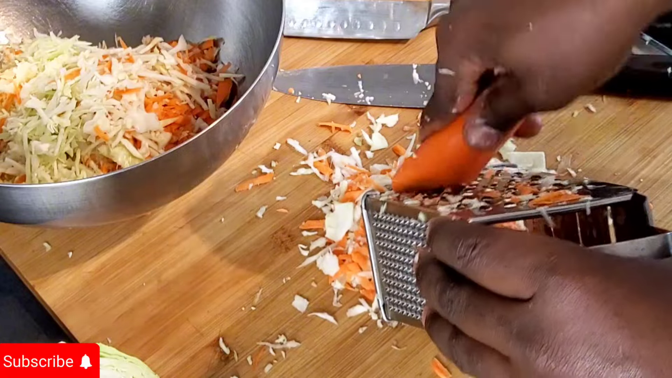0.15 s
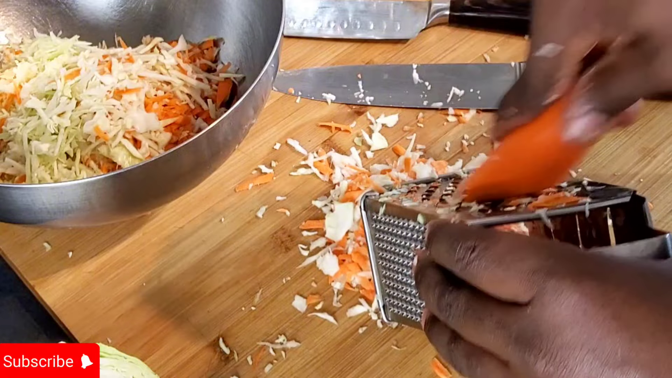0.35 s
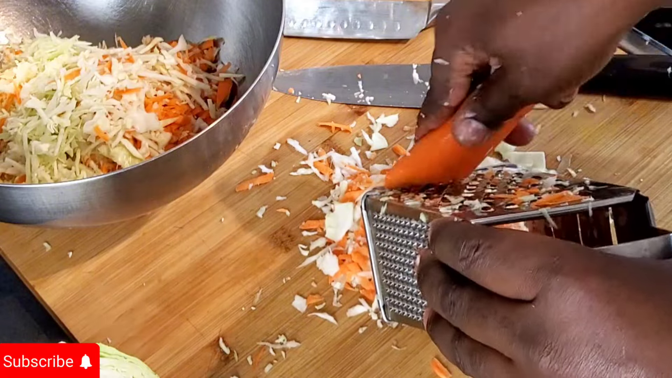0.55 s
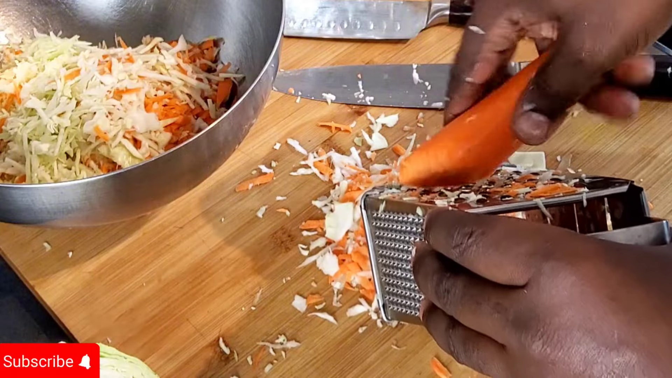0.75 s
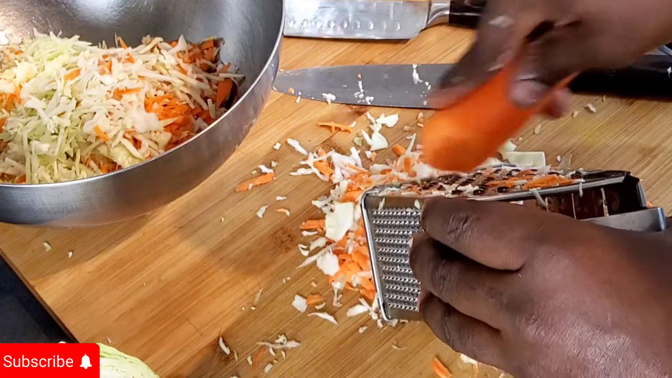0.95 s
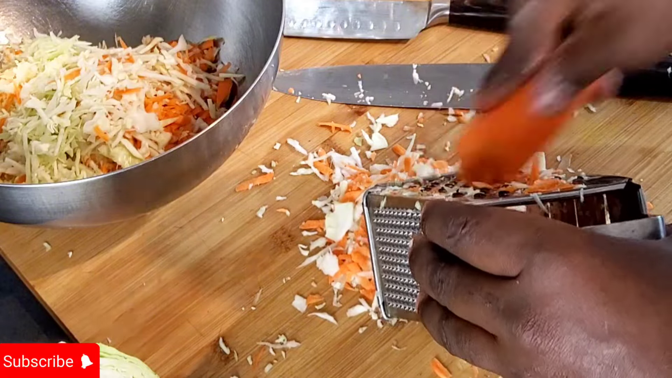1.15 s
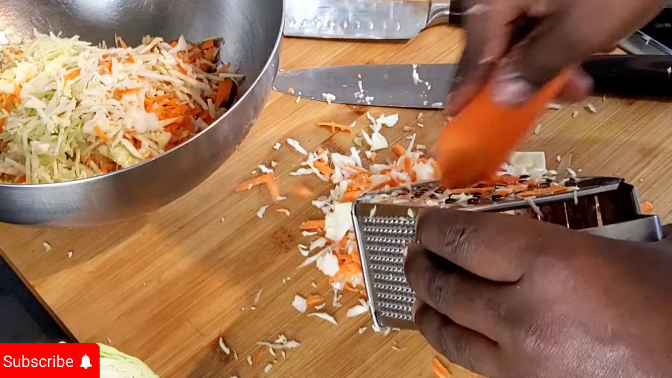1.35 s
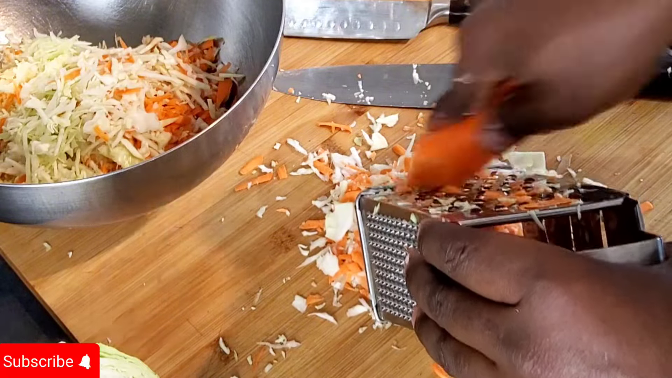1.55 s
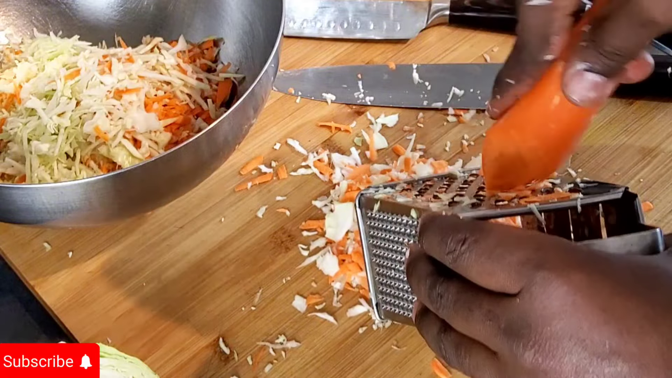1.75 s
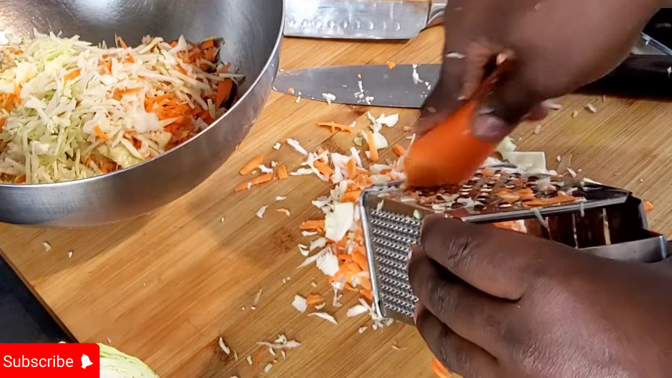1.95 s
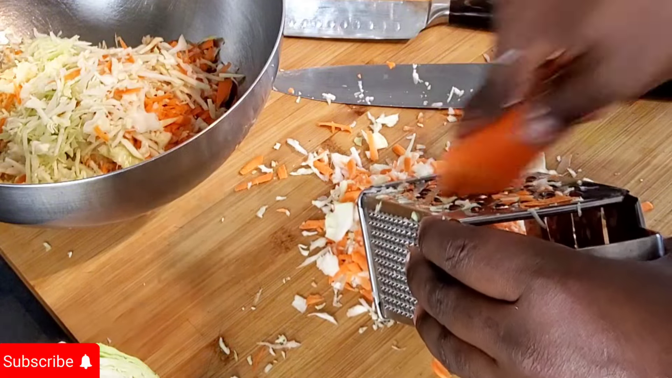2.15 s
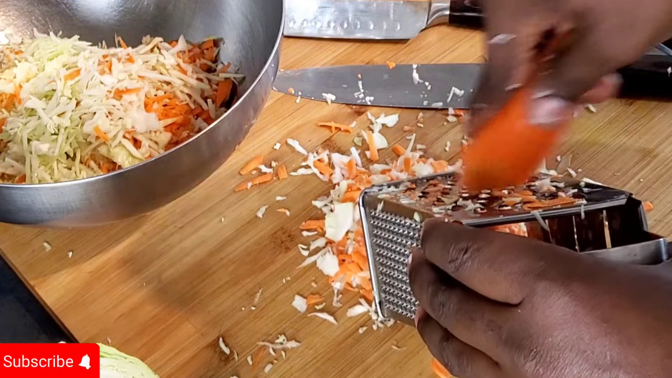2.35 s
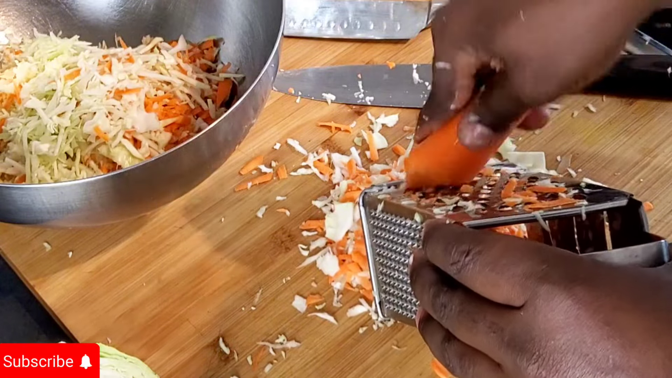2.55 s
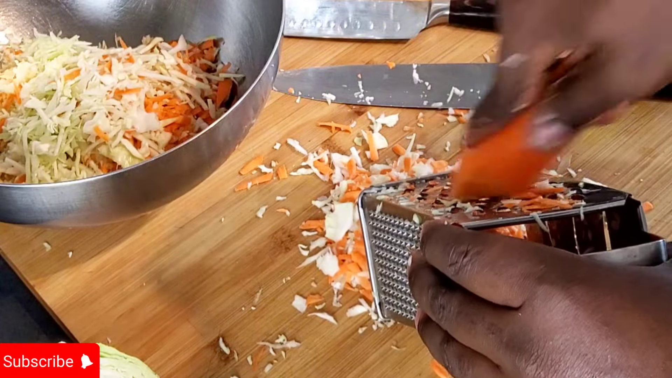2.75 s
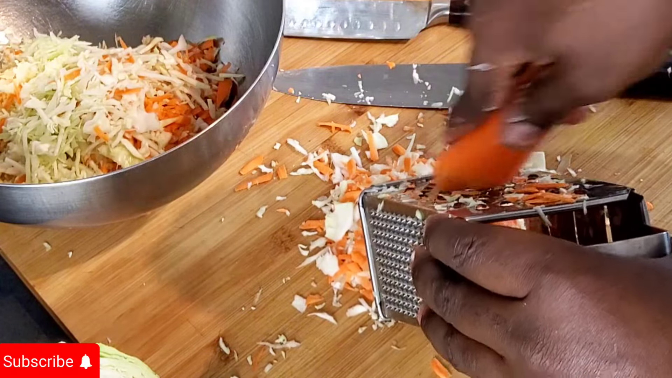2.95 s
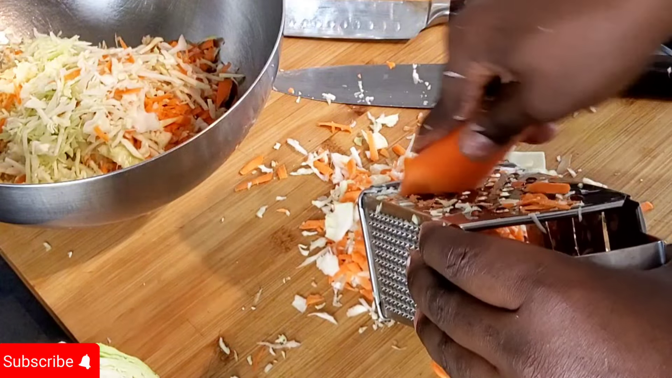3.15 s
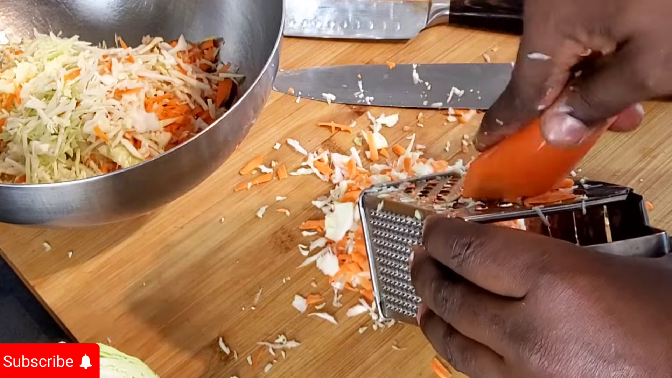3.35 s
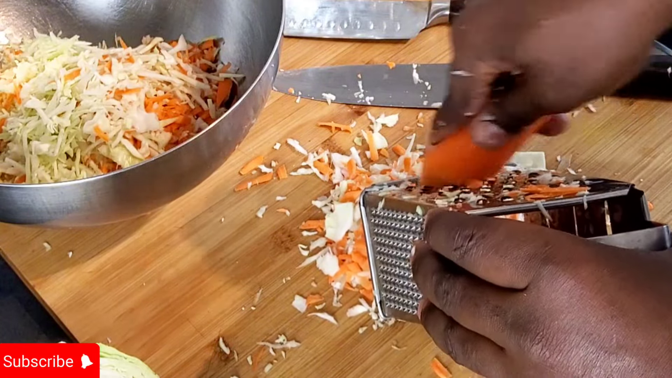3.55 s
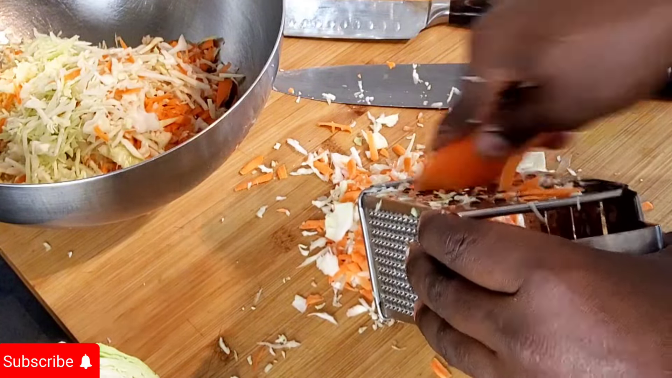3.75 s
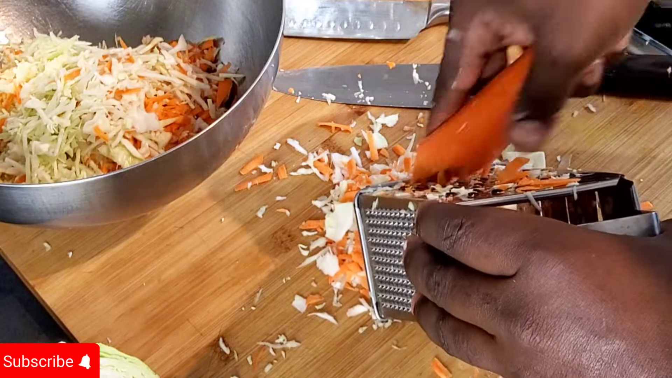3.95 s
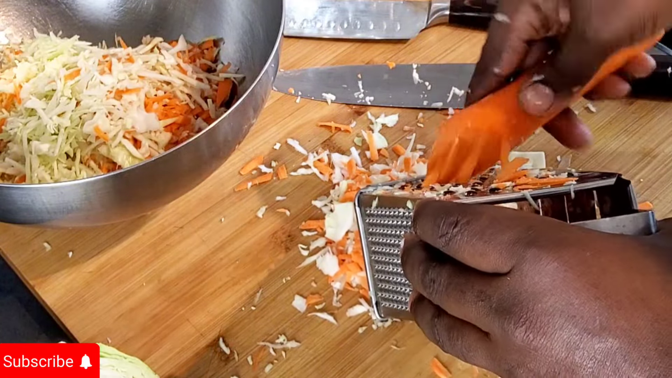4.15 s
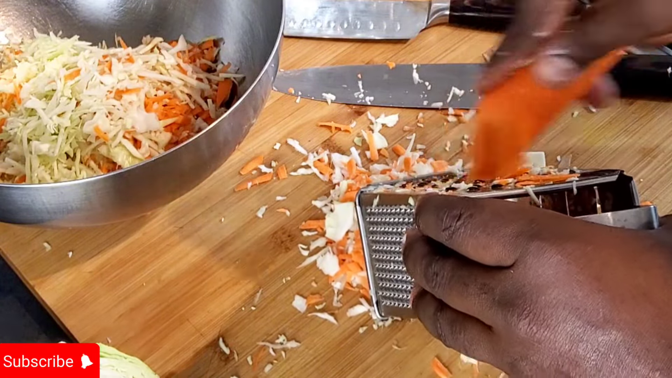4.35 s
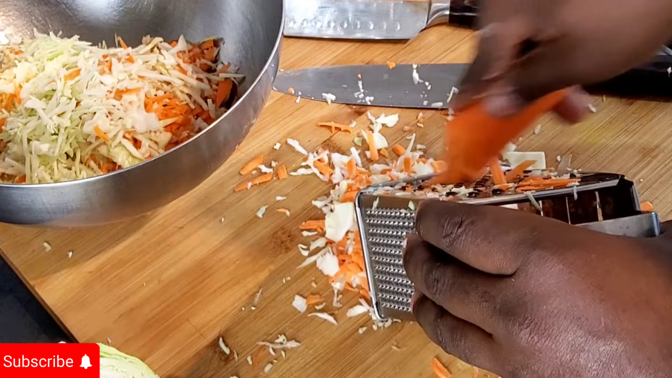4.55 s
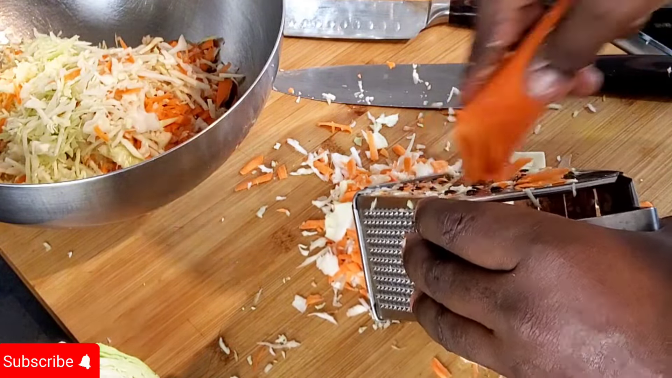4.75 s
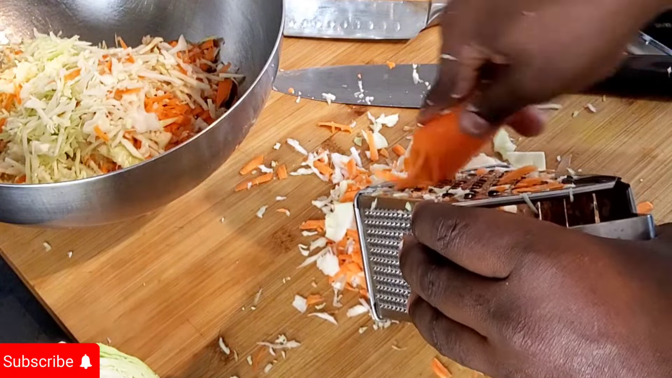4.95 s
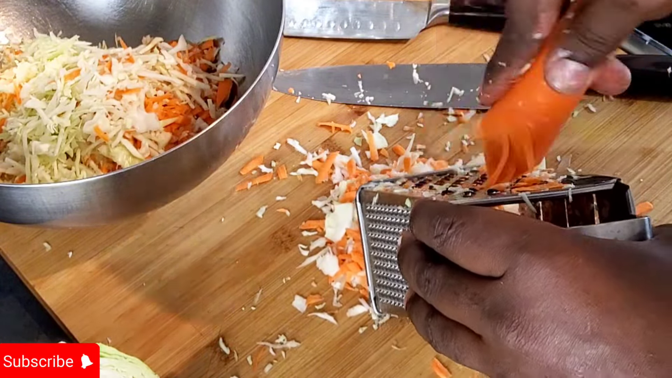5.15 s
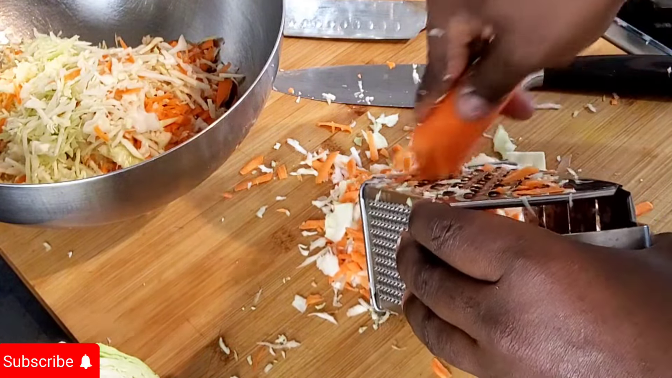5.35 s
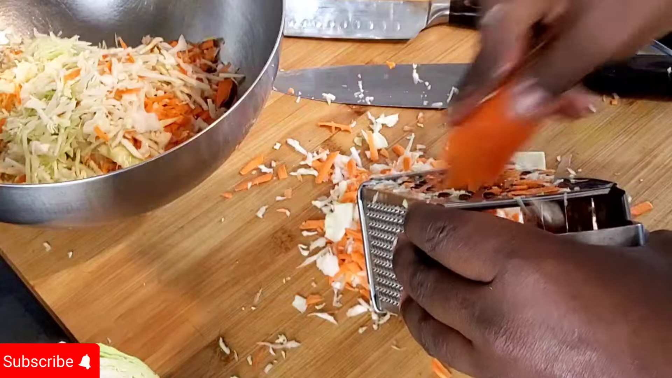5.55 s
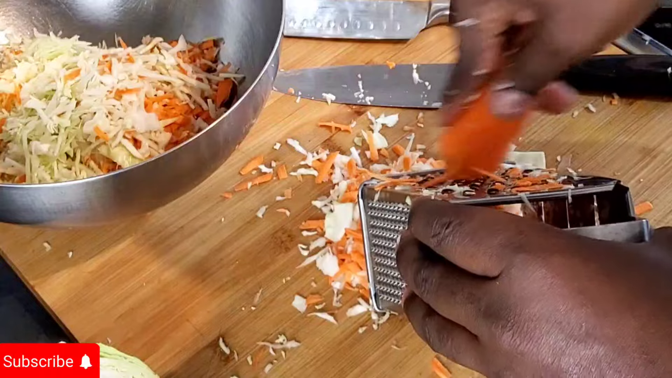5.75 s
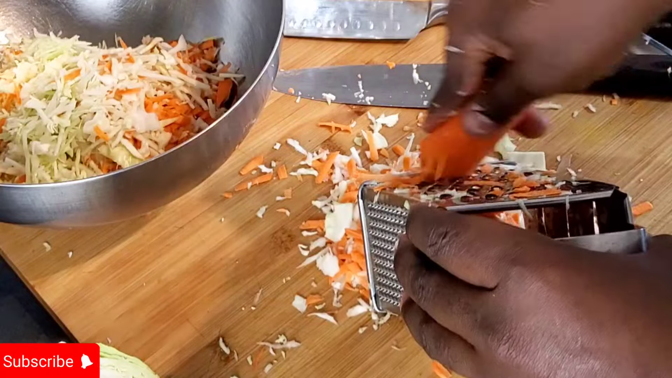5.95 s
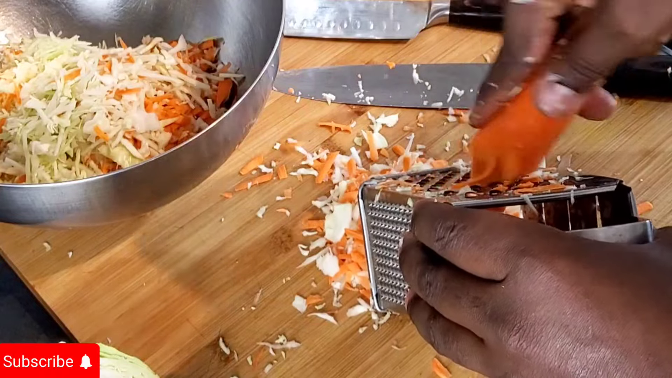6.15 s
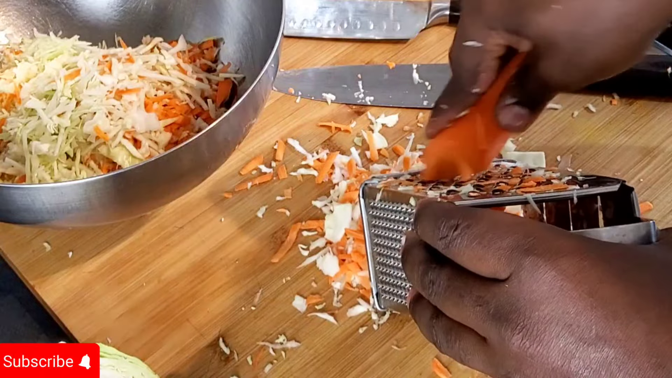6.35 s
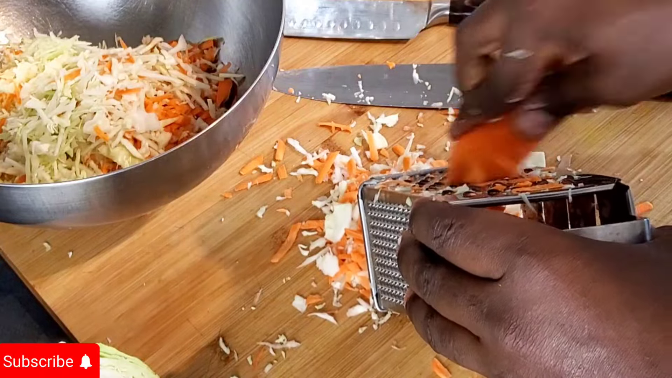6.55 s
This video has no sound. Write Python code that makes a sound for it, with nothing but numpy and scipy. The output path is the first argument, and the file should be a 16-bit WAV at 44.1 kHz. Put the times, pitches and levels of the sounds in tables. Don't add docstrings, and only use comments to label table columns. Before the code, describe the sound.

Heard from a hand's width by a small microphone, a firm carrot tears across grater teeth in short, hissy rasps. The thin metal box rings hollowly and its feet knock on a wooden board. Strokes come as a pair, then a long regular run, then a final run with heavy low bumps, separated by almost silent gaps. Small crisp fibre snaps punctuate the rasping.

```python
import sys
import numpy as np
from scipy import signal
from scipy.fft import rfft, irfft, next_fast_len
from scipy.io import wavfile
from scipy.ndimage import uniform_filter1d

SR = 44100
rng = np.random.default_rng(int(sys.argv[2]) if len(sys.argv) > 2 else 0)


def dump_mix(stems):
    frames = np.atleast_2d(stems).T
    limited = np.clip(frames, -1, 1)
    pcm = np.round(limited * 32767).astype(np.int16)
    wavfile.write(sys.argv[1], SR, pcm)


def invert_db(x):
    u = np.asarray(x, float) / 20
    return 10 ** u


N = 290619


def evened(x):
    return x / np.sqrt(np.mean(x ** 2) + 1e-20)


def steadied(x, span_s):
    power = uniform_filter1d(x ** 2, int(span_s * SR))
    return x / np.sqrt(power + 0.35 * np.mean(x ** 2))


def at_samples(t, *controls):
    return [np.interp(np.arange(N) / SR, t, control) for control in controls]


def add(mix, start_s, sound):
    part = mix[round(start_s * SR):][:len(sound)]
    part += sound[:len(part)]


def colour(x, points):
    hz, db = np.transpose(points)
    size = next_fast_len(len(x))
    bin_hz = np.fft.rfftfreq(size, 1 / SR)
    gain = invert_db(np.interp(np.log(bin_hz + 1), np.log(hz), db))
    return irfft(rfft(x, size) * gain, size)[:len(x)]


def ring(x, modes):
    out = 0
    for k, (hz, width_hz, db) in enumerate(modes):
        b, a = signal.iirpeak(hz, hz / width_hz, SR)
        out = out + (-1) ** k * invert_db(db) * signal.lfilter(b, a, x)
    return out


def flutter(span_s, depth_db):
    size = max(int(span_s * SR), 2)
    smooth = uniform_filter1d(uniform_filter1d(rng.standard_normal(N), size), size)
    return invert_db(depth_db * evened(smooth))


def summed(*levels_db):
    return 10 * np.log10(sum((invert_db(level) ** 2).sum(0) for level in levels_db))


def after(u, ease_s):
    return ease_s * np.logaddexp(0, u / ease_s)


ROCK_RISE_DB, ROCK_FALL_DB = 28.5, 14.5


def hump(u):
    slope_db = np.where(u < 0, ROCK_RISE_DB, ROCK_FALL_DB)
    return -slope_db * (np.sqrt(1 + u ** 2) - 1)


# t/s, level/dB, low f/Hz, high f/Hz
SIDE_BURSTS = [
    (.094, -22.5, 9060, 10950),
    (3.487, -22.5, 9050, 12000),
]


def side_bursts():
    out = np.zeros(N)
    noises = rng.standard_normal((len(SIDE_BURSTS), 2048))
    for (s, db, low_hz, high_hz), noise in zip(SIDE_BURSTS, noises):
        band_pass = signal.butter(8, [low_hz, high_hz], "band", fs=SR, output="sos")
        band = signal.sosfiltfilt(band_pass, noise)
        add(out, s, invert_db(db) * evened(band) * np.hanning(2048))
    return np.outer([1, -1], out)


# t/s, peak level/dB, f/Hz
COUNTER_BUMPS = [(0.35, -24.5, 150), (0.584, -30, 129), (0.623, -29, 93), (0.717, -37, 92.3),
                 (1.259, -26, 207), (5.678, -10.5, 87), (5.709, -4.5, 197), (5.747, 1.5, 143),
                 (5.776, -3, 236), (5.844, -11, 79), (5.876, -7, 103), (5.933, -15, 180), (6.081, -24, 155),
                 (6.148, -14, 111)]


def bumps():
    out, t = np.zeros(N), np.arange(4000) / SR
    for s, db, hz in COUNTER_BUMPS:
        u = t * hz
        cycles = u + 0.48 * (1 - np.exp(-u / 1.2))
        swing = np.sin(2 * np.pi * cycles) * u * np.exp(-u / 0.41)
        add(out, s, invert_db(db - 4.5) * swing / abs(swing).max())
    return out


# t/s, width/s, board hum level/dB, counter rumble level/dB, knock of the feet level/dB
PRESSES = [(0.161, 0.034, -33, -45, -37), (0.49, 0.029, -31, -41, -44), (1.263, 0.049, -30, -40, -35),
           (1.61, 0.055, -39.5, -50, -37.6), (1.921, 0.045, -41.5, -52, -35.5),
           (2.221, 0.017, -33.7, -44, -36), (2.265, 0.023, -36.5, -43, -39),
           (2.554, 0.031, -41.5, -47.5, -43.5), (2.874, 0.028, -41.6, -50, -46),
           (3.17, 0.037, -35.7, -41, -40), (3.499, 0.039, -39.5, -44, -39),
           (3.812, 0.03, -29.7, -39.5, -45.5), (4.63, 0.036, -26.5, -37, -33),
           (4.983, 0.045, -30.4, -37, -36), (5.329, 0.045, -30.5, -37, -35),
           (5.667, 0.041, -30, -39, -36.5), (6.314, 0.059, -51.5, -59, -48.5)]
# (t/s, width/s, three levels/dB)
TURNS = [(0.007, 0.034, -31, -40, -35.5), (1.108, 0.018, -38.5, -56, -43),
         (1.415, 0.024, -30.5, -60, -52.7), (1.435, 0.044, -36, -60, -40.5),
         (1.759, 0.039, -26.5, -45.1, -31.5), (2.102, 0.029, -28, -37.5, -30.5),
         (2.436, 0.033, -30, -42, -33.5), (2.716, 0.058, -65.4, -76, -59), (3.035, 0.033, -69, -76, -54.5),
         (3.346, 0.029, -59, -73, -52), (3.633, 0.18, -71.5, -72, -63), (4.224, 0.031, -80.5, -87, -90.5),
         (4.715, 0.083, -42.5, -47, -45.5), (4.822, 0.036, -42.5, -61, -40),
         (5.128, 0.038, -37.5, -46.5, -40.8), (5.475, 0.063, -33.5, -39.5, -35)]
# (t/s, width/s, three levels/dB)
JOLTS = [(0.368, 0.043, -41, -35.5, -49), (0.589, 0.025, -42, -28.5, -65),
         (0.638, 0.016, -45.5, -22.5, -58), (0.73, 0.029, -60.5, -30.5, -65.9),
         (0.827, 0.065, -81.5, -47, -72.5), (0.913, 0.096, -82, -79, -88.8), (5.679, 0.019, -26, -15, -27),
         (5.738, 0.036, -17.5, -21, -23.5), (5.796, 0.012, -45.4, -13.5, -49.6),
         (5.858, 0.051, -27, -19, -32.1), (5.94, 0.017, -29.5, -21, -52), (5.984, 0.023, -29, -19, -44),
         (6.091, 0.017, -25.5, -29, -45), (6.147, 0.077, -42.5, -24.5, -51.5),
         (6.437, 0.016, -92.5, -44, -82), (6.493, 0.033, -66, -51.5, -56.5)]
STILL_DB = -102.0


def rocking():
    t = np.arange(0, N / SR + .002, .001)
    s, width, *levels_db = np.vstack([PRESSES, TURNS, JOLTS]).T[:, :, None]
    shape_db = hump((t - s) / width)
    still_db = np.full((1, len(t)), STILL_DB)
    return at_samples(t, *[summed(db + shape_db, still_db) for db in levels_db])


HUM_HZ = 193.8
# f/Hz, level/dB per Hz
THUD_SPECTRUM = [(100, -30.5), (140, 6), (250, -2), (330, -52)]
# f/Hz, level/dB per Hz
RUMBLE_SPECTRUM = [(25, -30.5), (50, 5.5), (70, 6.5), (110, 10.5), (140, -8), (200, -54.5)]
# f/Hz, width/Hz, level/dB
KNOCK_MODES = [(277, 30, 5.5), (376, 78, -0.5), (473, 40, 6), (617, 110, -1)]


def board():
    hum_db, rumble_db, knock_db = rocking()
    thud_noise, rumble_noise, feet_noise = rng.standard_normal((3, N))
    tonal = 1 / (1 + np.exp((rumble_db - hum_db + 9.5) / 1.9))
    phase = 2 * np.pi * np.cumsum(HUM_HZ * flutter(.02, .3)) / SR
    tone = np.sqrt(2) * np.sin(phase) * flutter(.012, 1.5)
    thud = steadied(colour(thud_noise, THUD_SPECTRUM), 0.032)
    hum = np.sqrt(tonal) * tone + np.sqrt(1 - tonal) * thud
    rumble = steadied(colour(rumble_noise, RUMBLE_SPECTRUM), 0.32)
    chatter = feet_noise * flutter(0.012, 1.0)
    knock = ring(ring(chatter * invert_db(knock_db), KNOCK_MODES), [(390, 190, 0)])
    knock = knock / np.std(ring(chatter, KNOCK_MODES))
    return invert_db(hum_db + 3.0) * hum + invert_db(rumble_db - 3.0) * rumble + invert_db(1.5) * knock


# t/s, f/Hz, level/dB
SKIN_SQUEAK = [
    (.97, 15300, -78),
    (1.03, 14950, -67),
    (1.07, 14850, -68),
    (1.13, 14800, -87),
]


def squeak():
    points = [(0, 15000, -140), (.96, 15000, -140)] + SKIN_SQUEAK + [(1.14, 15000, -140)]
    s, *columns = np.transpose(points)
    hz, db = at_samples(s, *columns)
    return invert_db(db) * np.sin(2 * np.pi * np.cumsum(hz) / SR) * flutter(.004, 2.5)


# t/s, peak level/dB, f/Hz, t60/s
FIBRE_SNAPS = [(0.9624, -59, 7000, 0.016), (1.0266, -61, 8140, 0.01), (2.3457, -12.5, 8550, 0.06),
               (2.3794, -16, 13400, 0.032), (2.395, -17, 11600, 0.022), (2.417, -34, 9000, 0.015),
               (2.437, -36, 11000, 0.019), (3.0662, -39, 12300, 0.014), (4.3666, -60.5, 12900, 0.045),
               (4.4374, -51.5, 13700, 0.011), (4.4902, -59, 7010, 0.022), (4.5093, -57, 7020, 0.016),
               (5.1575, -30, 9700, 0.023), (5.482, -27, 13500, 0.02), (5.7744, -33, 12500, 0.02)]


def snaps():
    out, t = np.zeros(N), np.arange(1500) / SR
    noises = rng.standard_normal((len(FIBRE_SNAPS), 1500))
    for (s, db, hz, t60), noise in zip(FIBRE_SNAPS, noises):
        decay = invert_db(-60 * t / max(t60, .004))
        burst = noise * decay * np.minimum(t / 0.0015, 1)
        burst = ring(burst, [(hz, 0.44 * hz, 0)]) + 0.16 * burst
        add(out, s, invert_db(db - 2.5) * burst / abs(burst).max())
    return out


# t/s, length/s, level/dB, f/Hz
PANEL_RINGS = [(0.25, 0.11, -53.5, 2930), (1.082, 0.093, -64, 967), (1.084, 0.065, -62.5, 1412),
               (1.07, 0.056, -70.5, 5600), (1.222, .07, -28.5, 1713), (1.243, 0.095, -37, 1003),
               (1.561, 0.057, -29, 1690), (2.25, 0.089, -33.5, 469), (2.338, .022, -35.5, 2700),
               (2.342, 0.029, -39, 3344), (2.409, 0.03, -42, 1950), (2.511, 0.057, -25.5, 1750),
               (3.614, 0.077, -50, 1770), (3.641, 0.067, -50, 2240), (3.624, 0.07, -53, 3390),
               (3.638, 0.066, -55, 4550), (5.965, 0.055, -28, 900), (6.281, 0.1, -40, 516.7),
               (6.566, 0.045, -51, 4790)]


def panel_rings():
    out = np.zeros(N)
    noises = rng.standard_normal((len(PANEL_RINGS), 8000))
    for (s, length_s, db, hz), noise in zip(PANEL_RINGS, noises):
        size = int(length_s * SR)
        mode = [(hz, 0.012 * hz, 0)]
        tone = ring(ring(noise, mode), mode)[-size:]
        add(out, s, invert_db(db) * evened(tone) * np.hanning(size))
    return out


def tearing(per_s=6000, spread_db=0.0):
    sizes = invert_db(spread_db * np.minimum(rng.exponential(1, N), 4))
    cracks = sizes * (rng.random(N) < per_s / SR) * rng.choice([-1, 1], N)
    slide = 0.37 * rng.standard_normal(N)
    return (evened(cracks) + slide) * flutter(.0012, 1.0) * flutter(.006, .7)


def patched(x, bins, frames, patchy_db):
    z = signal.stft(x, nperseg=512, noverlap=384)[2]
    field = rng.standard_normal(z.shape)
    for _ in range(2):
        field = uniform_filter1d(field, max(int(bins), 1), 0)
        field = uniform_filter1d(field, max(int(frames), 1), 1)
    depth_db = np.pad(patchy_db, (0, 1024), "edge")[::128][:z.shape[1]]
    gain = invert_db(depth_db * evened(field))
    gain /= np.sqrt(np.mean(gain ** 2, axis=0))
    return evened(signal.istft(z * gain, nperseg=512, noverlap=384)[1][:N])


# bite t/s, rasp level/dB, hold/s, fade/(dB per s), box ring level relative to rasp/dB
STROKES = [(0.083, -10.5, 0.06, 257.5, -7), (0.427, -10, 0.065, 277.5, -8),
           (1.197, -20, 0.058, 230.5, -0.7), (1.544, -17.5, 0.064, 245, -0.5),
           (1.863, -14, 0.072, 240.5, -3.5), (2.186, -13, 0.066, 265.5, -6.5),
           (2.495, -11.5, 0.063, 265.5, -7), (2.812, -13.5, 0.064, 310.5, -8.5),
           (3.13, -14.5, 0.081, 369.5, -8.7), (3.45, -13.5, 0.064, 304, -5.5),
           (3.763, -13.5, 0.061, 331, -8), (4.568, -17.5, 0.049, 185, -2.5),
           (4.93, -15, 0.044, 213.5, -2.5), (5.251, -17.0, 0.088, 242.0, -2.5),
           (5.589, -14, 0.077, 277, -5), (5.934, -13.5, 0.062, 292.5, -5), (6.254, -18.0, 0.088, 360, -8.5),
           (6.596, -6.5, 0.08, 250.0, -6.5)]
BITE_DB_PER_S, SWELL_DB, SWELL_S, LIFT_S = 1400, 14.5, 0.019, 0.0068
BOX_LAG_DB, BOX_LAG_S = 7.0, 0.023
# turn t/s, length/s, rasp level/dB, box ring level relative to rasp/dB
RETURNS = [(0.009, 0.068, -40, 7), (0.379, 0.171, -47, 0.5), (1.448, 0.067, -57.5, 14.5),
           (1.807, 0.11, -48.2, 8), (2.129, 0.06, -43, 6), (2.449, 0.064, -39.5, 1.5),
           (2.738, 0.032, -54.5, 2.5), (3.113, 0.11, -61, 3.5), (3.374, 0.016, -52, 0.5),
           (3.686, 0.043, -46.0, -0.2), (4.854, 0.063, -67.5, 19), (5.183, 0.076, -47.5, 8),
           (5.588, 0.12, -45.5, 3.5), (5.852, 0.06, -42, -1), (6.2, 0.11, -51, -0.5),
           (6.512, 0.012, -57.5, 2.5)]
SAG_DB_PER_S, LAND_DB_PER_S, TURN_DB_PER_S, EASE_S = 145.5, 280.5, 279.5, .008
AIRBORNE_S = 0.3
# t/s, width/s, rasp level/dB, box ring level relative to rasp/dB
BRUSHES = [(.74, .06, -78.5, 5.5), (.89, 0.04, -68, -8), (1.01, 0.031, -77, -26.5), (1.11, 0.034, -65, -1),
           (1.166, 0.018, -54, -20), (4.0, .04, -71.5, -7), (4.212, 0.012, -72.5, -10),
           (4.436, .018, -75, -22.5), (4.516, 0.0089, -83, -25)]
REST_DB, REST_BOX_DB = -84.5, -99.0


def contact():
    t = np.arange(0, N / SR + .002, .001)
    s, db, hold, fade, box_db = np.transpose(STROKES)[:, :, None]
    since = np.maximum(t - s, 0)
    push = db - SWELL_DB * np.exp(-since / SWELL_S)
    push = push + BITE_DB_PER_S * np.minimum(t - s, 0) - fade * after(t - s - hold, LIFT_S)
    push_box = push + box_db - BOX_LAG_DB * np.exp(-since / BOX_LAG_S)

    s, length, db, drag_box_db = np.transpose(RETURNS)[:, :, None]
    drag = db - SAG_DB_PER_S * (t - s + length / 2)
    drag = drag - TURN_DB_PER_S * after(t - s, EASE_S)
    drag = drag - LAND_DB_PER_S * after(s - length - t, EASE_S)
    drag = drag - BITE_DB_PER_S * after(s - length - AIRBORNE_S - t, EASE_S)

    s, width, db, brush_box_db = np.transpose(BRUSHES)[:, :, None]
    brush = db + hump((t - s) / width)
    rest = np.ones((1, len(t)))
    rasp_db = summed(push, drag, brush, REST_DB * rest)
    box_ring_db = summed(push_box, drag + drag_box_db, brush + brush_box_db, REST_BOX_DB * rest)
    return at_samples(t, rasp_db, box_ring_db - rasp_db)


# f/Hz, level/dB per Hz
RASP_SPECTRUM = [(1500, -44.5), (3000, -21), (5600, -19.5), (9000, -10.5), (11500, -6.5), (13500, -2.5),
                 (15000, -6.5), (16000, -25)]
# f/Hz, level/dB per Hz
SCRAPE_SPECTRUM = [(300, -35.5), (550, 1.5), (800, -3.5), (1500, -7.5), (2500, -2), (4000, -6), (5500, -14),
                   (8000, -18)]
# f/Hz, width/Hz, level/dB
BOX_MODES = [(932, 60, -2), (1000, 45, -6), (1157, 260, -3.5), (1685, 85, 6), (1920, 120, -0.5),
             (2284, 40, -10.5), (2795, 80, -23.5), (3246, 130, -6.5), (4690, 110, -11)]


def grater():
    rasp_db, box_db = contact()
    teeth = tearing()
    light = np.clip((-18 - rasp_db) / 22, 0, 1)
    bright = colour(teeth, RASP_SPECTRUM)
    rasp = patched(bright, bins=2.0, frames=7.0, patchy_db=2.5 + 2.2 * light) * invert_db(rasp_db)
    force = patched(teeth, bins=1, frames=16.0, patchy_db=2.8 + 3.2 * light)
    shake = force * invert_db(rasp_db + box_db)
    scrape = colour(shake, SCRAPE_SPECTRUM) / np.std(colour(force, SCRAPE_SPECTRUM))
    return invert_db(0.5) * rasp + invert_db(-8.0) * scrape + invert_db(6.5) * ring(shake, BOX_MODES)


def scene():
    mono = bumps() + board() + squeak() + snaps() + panel_rings() + grater()
    return np.tile(mono, (2, 1))


def band_limit(x):
    return signal.sosfilt(signal.butter(12, 16160, fs=SR, output="sos"), x)


def record(dry):
    high_pass = signal.butter(2, 36, "high", fs=SR, output="sos")
    limited = np.tanh(signal.sosfilt(high_pass, dry) / 1.1) * 1.1
    low_pass = signal.firwin(511, 15900, window=("kaiser", 10), fs=SR)
    limited = signal.oaconvolve(limited, low_pass[None], "same")
    return band_limit(limited + side_bursts())


dry = scene()
out = record(dry)
dump_mix(out)
```